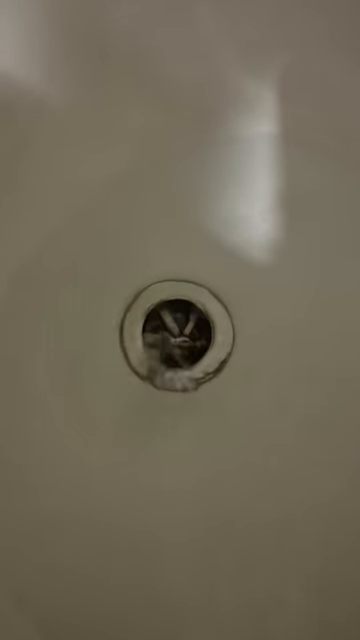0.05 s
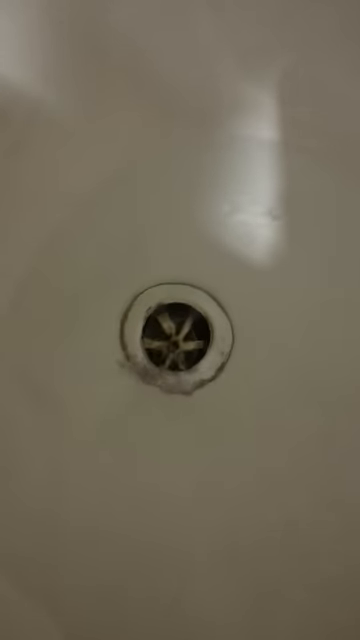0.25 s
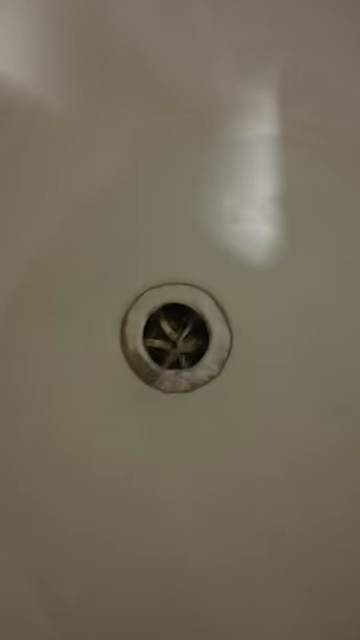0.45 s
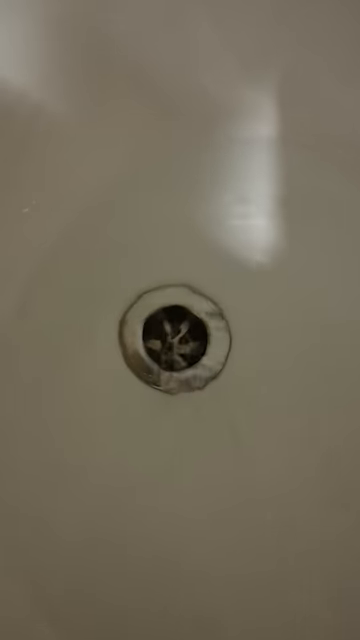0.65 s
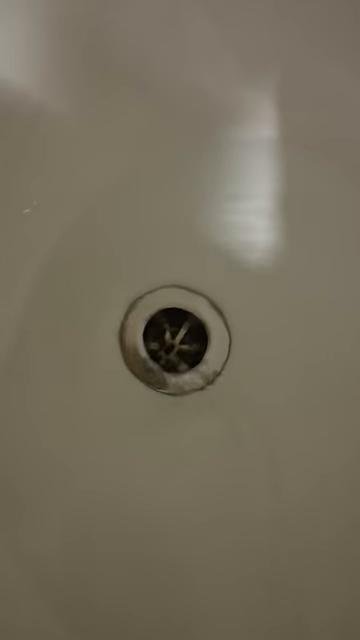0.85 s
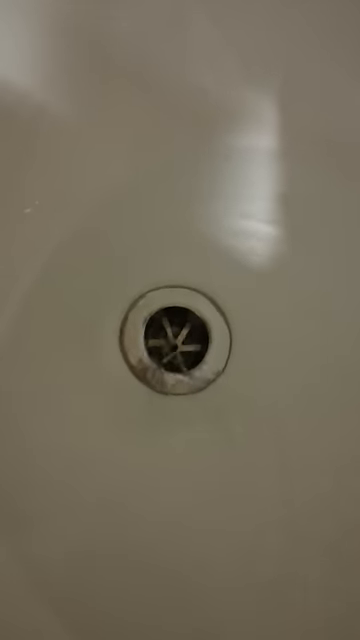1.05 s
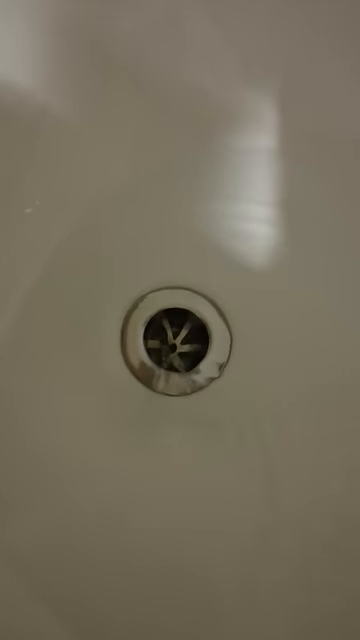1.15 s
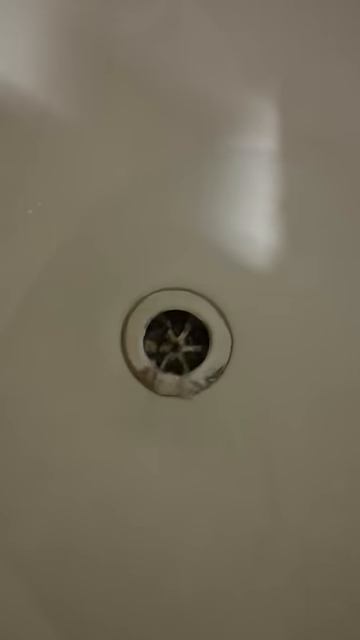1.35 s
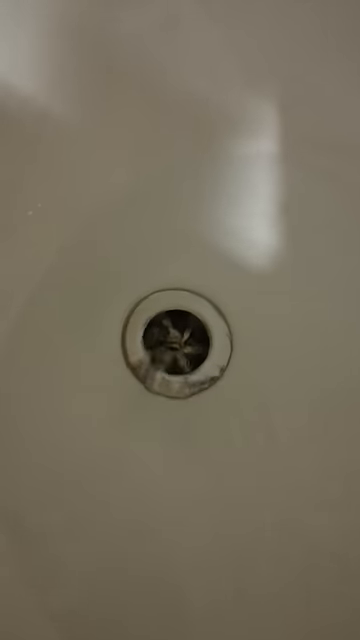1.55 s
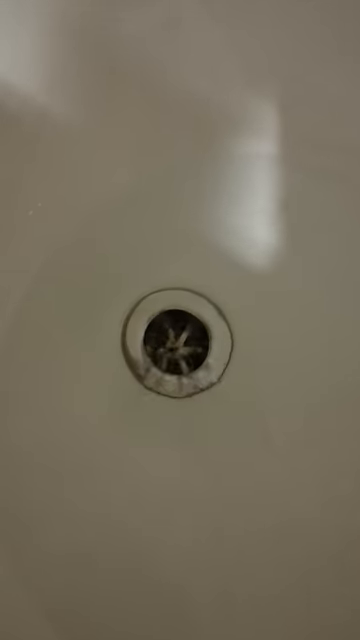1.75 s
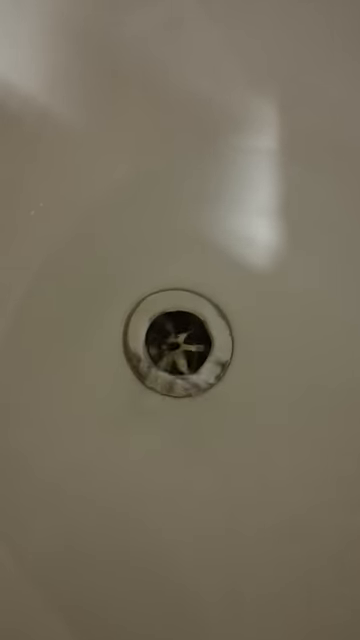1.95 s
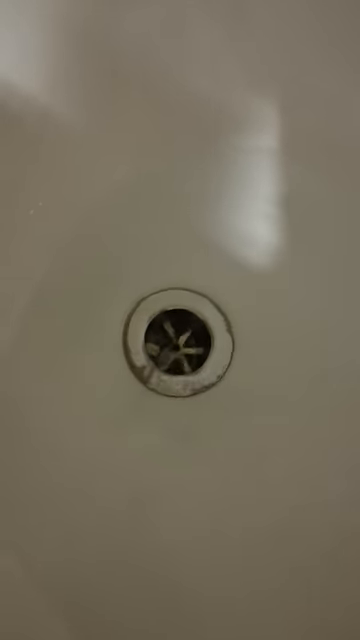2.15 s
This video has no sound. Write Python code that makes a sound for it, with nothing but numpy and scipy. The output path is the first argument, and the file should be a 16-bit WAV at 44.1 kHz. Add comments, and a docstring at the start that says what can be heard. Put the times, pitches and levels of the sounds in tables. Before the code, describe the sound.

Two loud gulps from a draining bathroom sink, followed by light bubbling trickles.

```python
"""The last water runs out of a bathroom basin. Over a light trickle, air breaks through the plug hole
in two loud gulps, each opening with a dull knock and sweeping up in pitch as its air pocket shrinks.
The second comes with sharp ticks on the grate and a spray of droplets. After a short lull the water
trickles down the faintly ringing waste pipe, where small bubbles pop and ring.
The sounds echo in the bowl and in the small hard room."""
import sys
import numpy as np
from scipy import signal
from scipy.fft import rfft, irfft
from scipy.io import wavfile

SR = 44100
rng = np.random.default_rng(int(sys.argv[2]) if len(sys.argv) > 2 else 0)


def master(y):
    """Save y as 16-bit WAV."""
    cut = np.clip(np.atleast_2d(y).T, -1, 1)
    pcm = np.round(cut * 32767)  # scale
    wavfile.write(sys.argv[1], SR, pcm.astype(np.int16))


N = 97020
TIME = np.arange(N) / SR

# T60 is the time a sound takes to decay by 60 dB; the gap precedes the first reflections.
BOWL_T60_S, BUBBLE_BOWL_T60_S, BOWL_GAP_S = 0.12, 0.11, 0.003
ROOM_T60_S, ROOM_GAP_S = 0.3, 0.012
GULP_ATTACK_S = 0.002


def from_db(db):
    """Amplitude grows tenfold with every 20 decibels."""
    return 10 ** (np.asarray(db) / 20)


def rms_one(x):
    """Normalisation to unit rms gives a signal unit mean power."""
    return x / np.sqrt(np.mean(x ** 2) + 1e-20)


def at_hz(points, hz):
    """Interpolation on a logarithmic frequency axis treats all octaves alike."""
    known_hz, values = np.transpose(points)
    return np.interp(np.log(np.maximum(hz, 1)), np.log(known_hz), values)


def pan(db):
    """A level difference, left over right, sets the apparent direction of a source."""
    return from_db(db * np.array([[0.5], [-0.5]]))


def add(out, start_s, x):
    """Superposition: a sound sums into the stereo mix from its start time on."""
    i = int(np.clip(start_s * SR, 0, N - 1))
    out[:, i:i + x.shape[1]] += x[:, :N - i]


def diffuse(size, spectrum=None):
    """Diffuse-field noise is partly coherent between the channels in the bass, incoherent in the treble."""
    # Likeness of left and right. Each row: frequency in Hz, correlation from 0 to 1.
    likeness = [(40, 0.31), (100, 0.75), (300, 0.64), (700, 0.34), (1400, 0), (3000, 0)]
    hz = np.fft.rfftfreq(size, 1 / SR)
    mid, side = rfft(rng.standard_normal((2, size)))
    alike = at_hz(likeness, hz)
    stereo = np.sqrt(1 + alike) * mid + np.sqrt(1 - alike) * side * [[1], [-1]]
    gain = from_db(at_hz(spectrum, hz)) if spectrum else 1
    return rms_one(irfft(gain * stereo, size))


def echoes(x, t60, gap_s):
    """Reverberation: convolution with dense, exponentially decaying reflections of unit energy."""
    t = TIME[:SR // 2]
    tail = diffuse(len(t)) * from_db(-60 * t / t60) * (t > gap_s)
    tail /= np.sqrt(np.sum(tail ** 2) / 2)
    return signal.fftconvolve(np.atleast_2d(x), tail, axes=1)[:, :x.shape[-1]]


def ping(hz):
    """Bubble resonance: the film snaps, then the ring swells and dies, gliding up through its pitch."""
    snap_ratio, snap_t60_cycles, snap_db = 1.17, 6.5, 5
    swell_s = 0.0009 * np.sqrt(4000 / hz)  # larger, lower bubbles are slower
    octaves_per_swell = 0.095
    t = TIME[:SR // 20]
    swells, cycles = t / swell_s, t * hz
    pitch = hz * 2 ** (octaves_per_swell * (np.minimum(swells, 4) - 1.5))
    ring = np.sin(2 * np.pi * np.cumsum(pitch) / SR) * swells * np.exp(1 - swells)
    snap = np.sin(2 * np.pi * cycles * snap_ratio) * from_db(snap_db - 60 * cycles / snap_t60_cycles)
    return ring + snap * (1 - np.exp(-cycles ** 2))


def noise_floor():
    """Stationary broadband noise: water running in the pipe and the hiss of the room."""
    # Spectrum of the noise. Each row: frequency in Hz, relative spectral density in dB.
    spectrum = [(30, -21), (55, -12.5), (100, -4.5), (200, 2), (400, -1.5), (650, -6.5), (1200, -4.5),
                (3000, -17), (8000, -16), (14000, -20.5)]
    return from_db(-51) * diffuse(N, spectrum)


def pipe():
    """Forced resonance: running water keeps the air column of the waste pipe ringing faintly."""
    # Hollow resonances of the pipe. Each row: centre in Hz, half-width in Hz, relative level in dB.
    modes = [(487, 44, 3), (576, 29, 10), (636, 45, 7), (1025, 69, 1.5)]
    # Envelope of the ringing. Each row: time in seconds, level in dB.
    envelope = [(0, -45.5), (.12, -65.5), (.5, -61), (.7, -56.5), (1.15, -52.5), (1.4, -55.5), (1.7, -54.5),
                (2.2, -104)]
    hz = np.fft.rfftfreq(N, 1 / SR)
    response = sum(from_db(db) / (1 + 2j * (hz - centre) / width) ** 2 for centre, width, db in modes)
    ringing = rms_one(irfft(rfft(diffuse(N)) * response, N))
    return ringing * from_db(np.interp(TIME, *np.transpose(envelope)))


def trickle():
    """A Poisson process: tiny bubbles of many sizes pop at random, louder as more water flows."""
    # Strength of the trickle. Each row: time in seconds, relative level in dB.
    flow_levels = [(0, 4.5), (.2, 5), (.36, 7.5), (.46, -3.5), (.54, -17), (.6, 6.5), (.72, 11.5),
                   (.88, 8.5), (1.05, 2.5), (1.26, 2), (1.4, 3.5), (1.6, 4), (1.76, 5), (1.82, -3.5),
                   (1.9, 3), (2.05, -8.5), (2.2, -0.5)]
    # Spectrum of the crowd of bubbles. Each row: pitch in Hz, relative level in dB.
    fizz_spectrum = [(600, -14.5), (1050, 3.5), (1600, 1.5), (2500, 6), (3500, 3.5), (5000, 3.5),
                     (7000, -4.5), (10000, -29)]
    bubbles_per_s, spread_db, bowl_db, level_db = 900, 2.0, 15, -45
    run_in = SR // 5  # the water is already running at the start
    size = N + run_in
    flow = from_db(np.interp(TIME, *np.transpose(flow_levels)))
    flow = np.pad(flow, (run_in, 0), "edge")
    out, pitches = np.zeros((2, size)), np.geomspace(600, 10000, 24)
    for hz in pitches:
        onsets = rng.random(size) < bubbles_per_s / len(pitches) / SR
        strengths = from_db(spread_db * np.minimum(rng.exponential(1, size), 4))
        crowd = rms_one(signal.oaconvolve(onsets * strengths, ping(hz))[:size])
        direct = crowd * flow * from_db(at_hz(fizz_spectrum, hz))
        out += direct + from_db(bowl_db) * echoes(direct, BUBBLE_BOWL_T60_S, BOWL_GAP_S)
    return from_db(level_db) * rms_one(out[:, run_in:]) * pan(db=2.5)


def pops():
    """Multipath: each bubble pings at its own spot, with one clear reflection and its own bowl echoes."""
    # Single bubbles. Each row: start in seconds, pitch in Hz, relative level in dB, left over right in dB.
    bubbles = [(0.059, 4750, -47.5, 0), (0.098, 3290, -42.5, -0.5), (0.199, 5380, -43, 3),
               (0.256, 2960, -48.5, 6), (0.276, 2750, -43.5, 5), (0.296, 1830, -36, 6),
               (0.56, 4880, -48, 2), (0.584, 1257, -40.5, 3), (0.583, 2950, -48.5, 1),
               (0.592, 7100, -57.5, 10), (0.615, 4940, -46.5, 1), (0.641, 4050, -45.5, -5.5),
               (0.685, 1320, -40, 2), (0.684, 2004, -42.5, -2), (0.696, 4600, -50, 0),
               (0.738, 5240, -47, 6), (0.743, 4180, -40, -2), (0.751, 6560, -52, 9), (0.814, 4040, -48, -6),
               (0.828, 4960, -41.5, 2.5), (0.86, 2140, -42, 3), (0.86, 7900, -57.5, 10),
               (0.861, 2700, -38.5, 3), (0.919, 4900, -43.5, 1), (0.955, 2610, -43, 3),
               (0.986, 3000, -45, 0), (1.011, 4900, -50, 1), (1.044, 6380, -54, 10.5),
               (1.082, 2190, -45, 6), (1.174, 4700, -48, 4), (1.195, 4010, -43.5, -1),
               (1.28, 6970, -59.5, 8), (1.299, 2395, -41.5, 7), (1.304, 1790, -43, 3.5),
               (1.346, 2460, -45, 3), (1.371, 2200, -45.5, 1), (1.37, 5820, -48, 7),
               (1.444, 4870, -42.5, 1.5), (1.467, 3000, -43, 2), (1.483, 7380, -51, 5),
               (1.512, 3020, -44.5, 0), (1.538, 4620, -36.5, 1.5), (1.545, 6470, -55.5, 31),
               (1.594, 1275, -44.5, 7.5), (1.601, 1740, -43.5, 8), (1.651, 3500, -47.5, -6),
               (1.672, 4440, -43, -0.5), (1.728, 7800, -56.5, 9), (1.755, 4610, -39.5, 1),
               (1.829, 5290, -44.5, 4.5), (1.844, 1360, -50.5, 7.5), (1.877, 3470, -49.5, -1),
               (1.877, 5300, -56, 8), (1.926, 2990, -44.5, 1), (1.929, 6960, -61, 11),
               (1.983, 5150, -47.5, 3), (2.036, 4440, -51.5, 0), (2.079, 4640, -45, 1.5),
               (2.14, 3970, -43.5, 0), (2.142, 7500, -59, 11), (2.193, 4360, -48, 0)]
    reflection_s, reflection_db = 0.0065, -13.5
    gain_db, bowl_db, room_db = 1.5, 8, -6.5
    out = np.zeros((2, N))
    for start_s, hz, db, pan_db in bubbles:
        direct = np.pad(ping(hz), (0, SR // 5))
        lags = (reflection_s * SR * rng.uniform(0.7, 1.3, 2)).astype(int)
        reflection = from_db(reflection_db) * np.array([np.roll(direct, lag) for lag in lags])
        pop = direct + reflection + from_db(bowl_db) * echoes(direct, BUBBLE_BOWL_T60_S, BOWL_GAP_S)
        pop /= np.sqrt(np.mean(pop[:, :SR // 40] ** 2, axis=1, keepdims=True))  # unit rms over 25 ms
        add(out, start_s, pop * from_db(db + gain_db) * pan(pan_db))
    return out + from_db(room_db) * echoes(out, ROOM_T60_S, ROOM_GAP_S)


def ticks():
    """Direct sound dominates: bubbles bursting in the open, on the grate, are sharp and almost dry."""
    # Bursts on the grate. Each row: start in seconds, pitch in Hz, level in dB.
    bursts = [(.277, 5650, -25), (.294, 7500, -28)]
    out = np.zeros((2, N))
    for start_s, hz, db in bursts:
        add(out, start_s, from_db(db) * ping(hz)[None])
    return out + from_db(-7.5) * echoes(out, BOWL_T60_S, BOWL_GAP_S)


def sprays():
    """Incoherent summation: many fine droplets merge into a short, dying band of noise."""
    # Droplets thrown as the air pocket bursts and just after.
    # Each row: start in seconds, level in dB, T60 in seconds, lower and upper band edges in Hz.
    showers = [(0.293, -29.5, 0.31, 1300, 2660), (.297, -37, 0.21, 3100, 8670),
               (0.393, -34.5, 0.009, 5960, 12800), (0.401, -41.5, 0.073, 8700, 11900)]
    out, t = np.zeros((2, N)), TIME[:SR // 2]
    for start_s, db, t60, low_hz, high_hz in showers:
        band = signal.butter(4, [low_hz, high_hz], "band", fs=SR, output="sos")
        hiss = rms_one(signal.sosfilt(band, diffuse(len(t))))
        add(out, start_s, hiss * from_db(db - 60 * t / t60))
    return out


def thumps():
    """A damped oscillation: the water lets go with a short dull knock at the start of each gulp."""
    # Opening knocks. Each row: start in seconds, level in dB.
    knocks = [(0.191, -28.5), (.290, -22.5)]
    pitch_hz, t60 = 195, 0.056
    out, t = np.zeros((2, N)), TIME[:SR // 5]
    envelope = from_db(-60 * t / t60) * (1 - np.exp(-t / GULP_ATTACK_S))
    knock = np.sin(2 * np.pi * pitch_hz * t) * envelope
    for start_s, db in knocks:
        add(out, start_s, from_db(db) * knock[None])
    return out


def gulps():
    """An air pocket's resonance rises as it shrinks and excites low modes; bowl and walls reflect it."""
    # One sweep for each air pocket. Each row: time in seconds, pitch in Hz, level in dB.
    sweeps = [
        [(.190, 322, -25.5), (.203, 408, -25), (.226, 595.5, -19.5), (.234, 750, -14), (.248, 1079, -23.5),
         (.256, 1242, -34.5), (.267, 1380, -40)],
        [(.290, 558, -3.5), (.294, 674, -13.5), (.303, 704, -18.5), (.309, 887, -20), (.316, 1273, -25.5),
         (.323, 1337, -33), (.328, 1400, -54)],
    ]
    # Low modes of pipe and room. Each row: frequency in Hz, relative level in dB, T60 in seconds.
    low_modes = [(107.1, -40, 0.78), (159.5, -36.5, 0.23), (210.1, -32, 0.36), (286, -25.5, 0.24),
                 (410.6, -39, 0.43), (644, -21, 0.32), (708, -35, 0.34), (807, -24, 0.27)]
    # Distinct reflections. Each row: delay in seconds, left gain in dB, right gain in dB.
    walls = [(0.0127, -6.5, -15), (0.029, -19, -13)]
    release_s, mode_swell_s, mode_db_per_gulp_db = 0.0027, 0.041, 0.13
    pan_db_per_octave, centred_hz = 5, 452
    last_onset_db = sweeps[-1][0][2]
    direct, ringing, reflections = np.zeros((3, 2, N))
    for sweep in sweeps:
        times, hz, db = np.transpose(sweep)
        pitch = np.interp(TIME, times, hz)
        age = np.maximum(TIME - times[0], 0)
        attack = np.sin(np.pi / 2 * np.minimum(age / GULP_ATTACK_S, 1)) ** 2
        release = np.exp(-np.maximum(TIME - times[-1], 0) / release_s)
        phase = 2 * np.pi * np.cumsum(pitch * (age > 0)) / SR
        tone = np.sqrt(2) * np.sin(phase) * attack * release * from_db(np.interp(TIME, times, db))
        direct += tone * pan(pan_db_per_octave * np.log2(pitch / centred_hz))
        drive = from_db(mode_db_per_gulp_db * (db[0] - last_onset_db)) * (1 - np.exp(-age / mode_swell_s))
        for mode_hz, mode_db, t60 in low_modes:
            # a mode comes in as the sweep climbs through the octave below it
            reached = np.clip(2 * pitch / mode_hz - 1, 0, 1) ** 4
            mode = np.sin(2 * np.pi * mode_hz * age) * from_db(mode_db - 60 * age / t60)
            ringing += drive * reached * mode
    # the small bowl throws back little bass
    low_cut = signal.butter(3, 450, "high", fs=SR, output="sos")
    thrown = signal.sosfilt(low_cut, direct + 1e-18)
    for delay_s, left_db, right_db in walls:
        add(reflections, delay_s, thrown * from_db([[left_db], [right_db]]))
    bowl = from_db(-4.5) * echoes(thrown, BOWL_T60_S, BOWL_GAP_S)
    room = from_db(-5.5) * echoes(thrown, ROOM_T60_S, ROOM_GAP_S)
    return direct + ringing + reflections + bowl + room


def scene():
    """Superposition: gulps, spray, bubbles, trickle and pipe add to the steady noise floor."""
    return gulps() + thumps() + sprays() + ticks() + pops() + trickle() + pipe() + noise_floor()


def record(dry):
    """Band limiting: the microphone drops the deep bass, and the top is cut steeply."""
    low_cut = signal.butter(3, 73, "high", fs=SR, output="sos")
    high_cut = signal.ellip(10, 0.1, 80, 14750, fs=SR, output="sos")
    return signal.sosfilt(high_cut, signal.sosfilt(low_cut, dry))


dry = scene()
out = record(dry)
master(out)
```